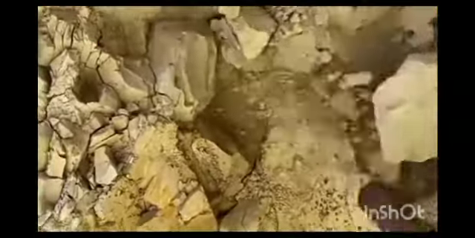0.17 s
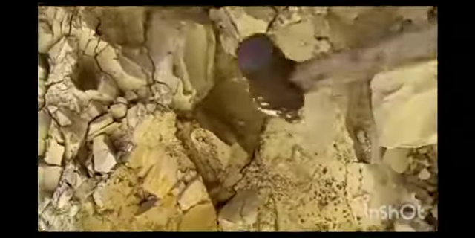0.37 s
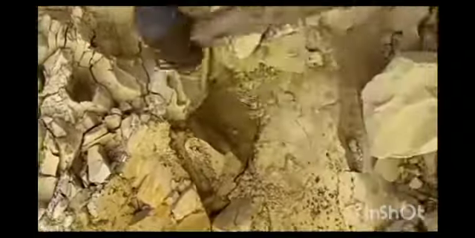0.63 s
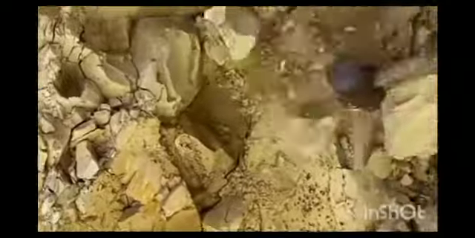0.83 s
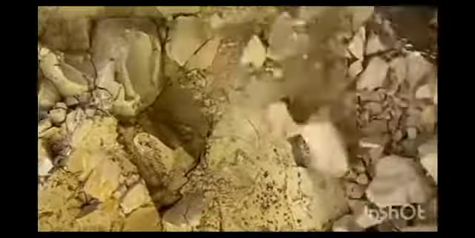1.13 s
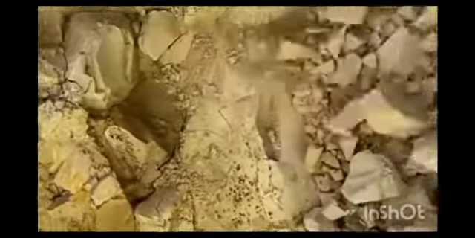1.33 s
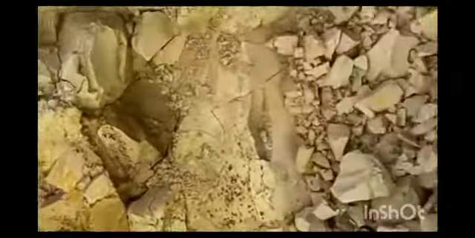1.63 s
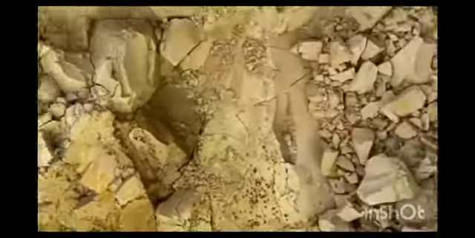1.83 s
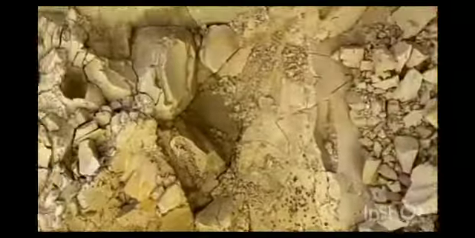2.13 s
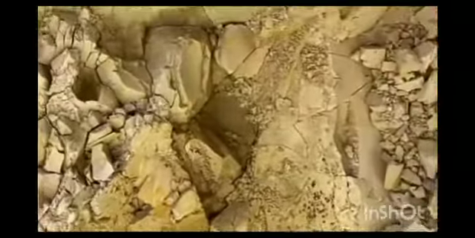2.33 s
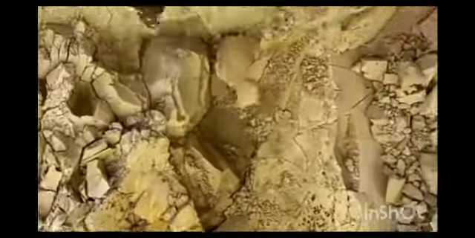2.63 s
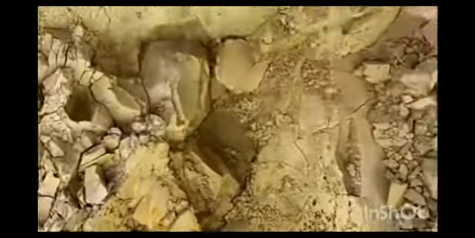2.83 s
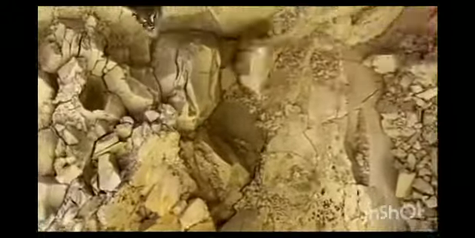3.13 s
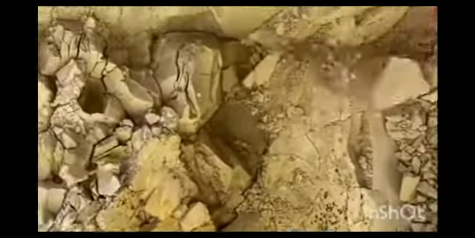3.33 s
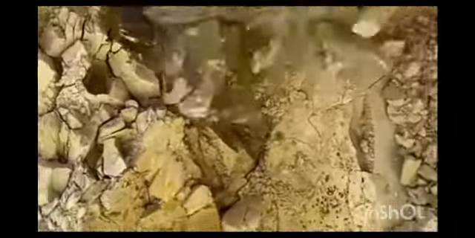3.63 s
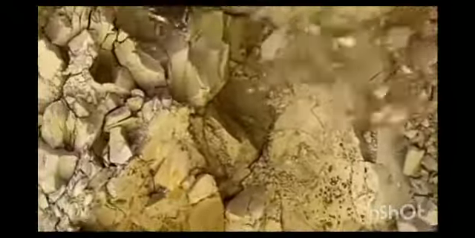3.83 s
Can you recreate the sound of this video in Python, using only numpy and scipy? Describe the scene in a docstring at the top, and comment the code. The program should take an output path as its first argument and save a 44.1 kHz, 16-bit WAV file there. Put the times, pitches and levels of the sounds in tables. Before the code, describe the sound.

Broken dry clay clicks and rattles as a hammer rakes it aside. After a short lull, two sharp blows send more crumbs tumbling, close to a small microphone over a steady low hiss.

```python
"""Hammer on dry clay.

A hammer rakes broken clay aside, then strikes it twice, close to a small microphone.
Pieces click, scrape and tumble over a steady low hiss; a thin ring near 3.7 kHz follows the blows.
The microphone passes little above 4.5 kHz and overloads on the hardest contacts."""
import sys
import numpy as np
from scipy import signal
from scipy.fft import rfft, irfft, next_fast_len
from scipy.io import wavfile
from scipy.ndimage import map_coordinates

SR = 44100
rng = np.random.default_rng(int(sys.argv[2]) if len(sys.argv) > 2 else 0)


def master(y):
    """Save y as 16-bit WAV."""
    cut = np.clip(np.atleast_2d(y).T, -1, 1)
    pcm = np.round(cut * 32767)  # scale
    wavfile.write(sys.argv[1], SR, pcm.astype(np.int16))


N = 4 * SR

# hammer and clay contacts: centre_s, level_db, length_s, pitch_hz, half_width_hz, lump_db
CONTACTS = [ (0.045, -26, 0.0037, 3420, 448, -9), (0.075, -13, 0.004, 2870, 245.6, -17.5),
            (0.081, -8, 0.0014, 2950, 200.3, -24), (0.086, -8, .0013, 3190, 215.3, -30.5),
            (.0905, -9, 0.0038, 3360, 250, -18), (0.108, -20.5, 0.007, 3140, 311, -22.5),
            (0.1127, -22, 0.0012, 2950, 246, -18), (0.1469, -6, 0.0021, 3370, 280, -27),
            (.151, -15.5, 0.005, 3220, 409, -14.5), (0.184, -28, 0.007, 3600, 282, -15.5),
            (0.286, -22, .003, 3280, 297, -15), (0.3858, -15, 0.0014, 3334, 210.4, -30),
            (0.4624, -18, .002, 3420, 291, -31), (0.4761, -7.5, 0.0028, 3318, 140.6, -36),
            (.480, -16, 0.0037, 3290, 261, -23.5), (0.561, -22.5, 0.004, 3695, 249, -29.5),
            (0.568, -16.5, 0.004, 2787, 129.4, -28), (0.61, -23.5, 0.0073, 2763, 150, -20.5),
            (0.6768, -14.5, .0018, 3400, 229, -30), (0.7225, -26, 0.0021, 3480, 301, -22.5),
            (1.0298, -18.5, 0.0046, 3640, 230, -29.5), (1.059, -16.5, 0.0046, 3475, 239, -17),
            (1.088, -28.5, 0.0036, 3544, 307.5, -12), (1.2922, -18.5, .0022, 3665, 220, -31),
            (1.315, -24.5, .006, 3676, 240, -25), (1.353, -16.5, 0.0014, 3447, 180, -35.5),
            (1.367, -18.5, .0027, 3655, 260, -26), (1.549, -18, .0023, 3570, 250, -30.5),
            (1.591, -15.5, 0.0018, 3635, 250, -22), (1.691, -17.5, 0.013, 3430, 255, -18.5),
            (1.748, -21, .003, 3440, 227.8, -17.5), (1.761, -20, .0037, 3500, 280, -21),
            (1.8057, -25, 0.0036, 3087, 446, -18), (1.848, -29, 0.0054, 3360, 392, -6),
            (2.024, -14, 0.004, 3130, 393, -22.5), (2.036, -14, 0.011, 3120, 400, -20.5),
            (2.046, -15.5, 0.0073, 3350, 351, -14.5), (2.408, -27.5, 0.0062, 2984, 277, -18),
            (2.425, -31.5, .006, 2930, 301, -21), (2.7526, -17, .0029, 3220, 364, -14.5),
            (2.757, -17.5, .0032, 3520, 395.5, -11), (2.809, -41, .0087, 3105, 366, -2),
            (2.999, -18, 0.0024, 3430, 202.2, -20.5), (3.0177, -19, 0.0015, 3290, 270, -30),
            (3.05, -22.5, .007, 3313, 377, -23), (3.068, -25, .0058, 3260, 339, -20.5),
            (3.134, -29.5, .0038, 3500, 199, -14), (3.1793, -24, 0.0038, 3340, 280, -23.5),
            (3.243, -10, 0.0014, 3300, 250, -27), (3.2585, -10.5, .0034, 2800, 325, -21.5),
            (3.2645, -1.5, .003, 3104, 400, -26.5), (3.267, -20.5, 0.0048, 2986, 490, -16),
            (3.331, -17.5, 0.0025, 3080, 330, -25.5), (3.65, -19, .0033, 3223, 210, -18),
            (3.668, -25, 0.0041, 3440, 249, -25.5), (3.706, -24.5, 0.0057, 3340, 437, -14),
            (3.714, -21.5, .003, 3066, 670, -20.5), (3.7197, -12.5, 0.0019, 3300, 319, -24),
            (3.7508, -20.5, .004, 3130, 452, -21), (3.761, -19.5, 0.0075, 3170, 380, -17),
            (3.77, -14.5, 0.0023, 2730, 280, -21), (3.773, -3, 0.0029, 2740, 279.6, -21.5),
            (3.776, -11.5, 0.0025, 1908, 120, -22.5), (3.7775, -4, .0037, 3064, 393, -28.5),
            (3.842, -19, 0.0059, 2896, 452, -21.5), (3.8708, -21, .004, 3115, 275, -22.5),
            (3.897, -31.5, 0.0049, 3090, 430, -18.5), (3.96, -27, .0033, 3620, 334.7, -15)]
# dull body of a struck lump: freq_hz, gain_db
LUMP_SPECTRUM = [(60, -36.5), (300, -22.5), (600, 5.5), (900, 3), (1350, 13.5), (1900, 12), (2600, -28.5),
                 (4300, -33.5), (5000, -3)]
# larger lumps landing: start_s, level_db, pitch_hz
KNOCKS = [(0.068, -23.5, 885), (0.094, -28, 1033), (.148, -27, 883), (.175, -28.5, 878),
          (.308, -27.5, 1082), (.479, -25, 1375), (0.564, -19, 1375), (0.586, -29.5, 1359),
          (0.605, -25, 1320), (0.674, -26, 1428), (1.056, -25.5, 1246), (1.242, -24, 1171),
          (2.814, -34, 1072), (2.999, -35.5, 831)]
# sliding rubble: time_s, level_db
SLIDE_ENVELOPE = [(0, -39), (.06, -41), (.1, -21), (.17, -35), (.24, -36), (.28, -22.5), (.315, -24),
                  (.35, -39.5), (.4, -29.5), (.45, -31), (.48, -23), (.55, -36), (.6, -36.5), (.74, -37),
                  (.8, -48), (.92, -66.5), (.955, -32.5), (.99, -49), (1.06, -40), (1.14, -31.5),
                  (1.3, -28.5), (1.37, -27), (1.42, -28), (1.47, -22.5), (1.52, -27), (1.56, -22),
                  (1.7, -24), (1.72, -27), (1.77, -23.5), (1.83, -36), (1.925, -34), (1.955, -26.5),
                  (1.975, -34), (2.0, -25.5), (2.045, -25), (2.075, -32), (2.13, -41.5), (2.35, -55),
                  (2.41, -34.5), (2.45, -48.5), (2.68, -49.5), (2.745, -31.5), (2.79, -58.5), (2.93, -55),
                  (2.95, -36.5), (3.06, -40), (3.1, -37), (3.22, -38.5), (3.26, -23), (3.3, -43),
                  (3.38, -50), (3.435, -33.5), (3.56, -36), (3.63, -33.5), (3.69, -33), (3.76, -34),
                  (3.8, -40.5), (3.91, -45.5), (3.94, -34.5), (4, -33)]
# sliding crumbs: freq_hz, gain_db
CRUMB_SPECTRUM = [(100, -58.5), (300, -54), (600, -34.5), (850, -21.5), (1200, -17), (1600, -17),
                  (2200, -18), (2700, -11.5), (3100, -3), (3750, 1), (4000, -13), (4300, -13.5),
                  (5000, -16.5)]
# narrow ringing tones after each contact: pitch_hz, level_db, t60_s
RING_TONES = [(800, -8.5, 0.094), (1310, -4, 0.058), (1620, -9.5, 0.041), (2013, -4, 0.049),
              (2510, -10.5, 0.023), (2880, -8, .06), (3400, -9.5, .08), (3663, -5, 0.11)]
# background hiss: freq_hz, gain_db
HISS_SPECTRUM = [(20, -3), (35, -1.5), (60, -6.5), (100, -6), (160, -6.5), (280, -16.5), (500, -9.5),
                 (800, -8), (1250, -3), (1500, -9.5), (1900, -13), (2250, -11.5), (2700, -3.5), (3200, -5),
                 (3650, 0.5), (4000, -20.5), (4400, -21.5), (5000, -19.5)]
# brief dip in the hiss: time_s, gain_db
HISS_ENVELOPE = [(2.765, 1), (2.785, -9), (2.93, -2.5), (3.05, -2.5), (3.3, -2)]
# microphone treble roll-off: freq_hz, gain_db
MIC_RESPONSE = [(4250, -0.5), (4480, -14.5), (4650, -33), (4850, -55), (5400, -82)]


def contacts(trim_db=1):
    """Each contact rings a strongly damped shard and knocks the lump behind it."""
    out = np.zeros(N)
    for centre_s, level_db, length_s, pitch_hz, half_width_hz, lump_db in CONTACTS:
        force = fractures(length_s)
        shard = filtered(force, lambda hz: (1 + ((hz - pitch_hz) / (3.36 * half_width_hz)) ** 2) ** -4)
        lump = shaped(force, LUMP_SPECTRUM)
        click = unit_rms(shard) + amp(lump_db) * unit_rms(lump)
        gain = amp(level_db + trim_db) * np.sqrt(length_s * SR / len(click))
        add_centred(out, gain * click, centre_s)
    return out


def fractures(length_s, crush_db=-12.5, rise_s=0.0061, fall_s=0.0084, size=3072):
    """A snap inside a crunch of tiny fractures; crumbs crush before and after it."""
    t = (np.arange(size) - size // 2) / SR
    core = np.exp(-(t / (0.86 * length_s)) ** 2)
    crush = amp(crush_db) * np.exp(-np.abs(t) / np.where(t < 0, rise_s, fall_s))
    force = rng.standard_normal(size) * (core + crush)
    force /= np.linalg.norm(force)
    force[size // 2] += 2.2 * np.exp(-length_s / 0.0017)  # short contacts snap, long ones crunch
    return force


def knocks(rise_s=0.0037, t60_s=0.05, overtone_ratio=1.6, overtone_db=-9, size=8192):
    """Larger lumps land with a short, rough, hollow note and one overtone."""
    out = np.zeros(N)
    t = (np.arange(size) - size // 2).clip(0) / SR
    envelope = (1 - np.exp(-t / rise_s)) * amp(-60 * t / t60_s)
    roughness_rad = 0.52 * wobble(350)
    for row, (start_s, level_db, pitch_hz) in enumerate(KNOCKS):
        phase = 2 * np.pi * pitch_hz * t + roughness_rad[row * size:][:size]
        note = np.sin(phase) + amp(overtone_db) * np.sin(overtone_ratio * phase)
        add_centred(out, amp(level_db) * envelope * note, start_s)
    return out


def rubble(grains_per_s=1300, spread_db=2.5, dust_db=-4.5, jerk_db=1.98):
    """Pieces slide in jerks: a dense rattle of crumbs over the rub of dust."""
    impulses = (rng.random(N) < grains_per_s / SR) * rng.choice([-1, 1], N)
    grains = impulses * amp(spread_db * np.minimum(rng.exponential(size=N), 3))
    rattle = unit_rms(grains) + amp(dust_db) * rng.standard_normal(N)
    scrape = comb_colour(shaped(rattle, CRUMB_SPECTRUM), copy_gain=0.25)
    return scrape * amp(curve(SLIDE_ENVELOPE) + jerk_db * wobble(70))


def scatter_and_ring(clay, scatter_db=-21.5, scatter_t60_s=0.036, ring_db=-18):
    """Short scatter and narrow tones after each contact, the longest a thin ring near 3.7 kHz."""
    t = np.arange(SR // 4) / SR
    scatter_ir = rng.standard_normal(len(t)) * amp(-60 * t / scatter_t60_s)
    ring_ir = sum(np.cos(2 * np.pi * hz * t) * amp(db - 60 * t / t60_s) for hz, db, t60_s in RING_TONES)
    scatter = unit_rms(signal.fftconvolve(clay, scatter_ir)[:N])
    ring = unit_rms(signal.fftconvolve(clay, ring_ir)[:N])
    return clay.std() * (amp(scatter_db) * scatter + amp(ring_db) * ring)


def background(hiss_db=-43, waver_db=1.6, hum_hz=402, hum_db=-71):
    """Slightly wavering hiss and rumble with one brief dip; a faint hum."""
    hiss = comb_colour(shaped(rng.standard_normal(N), HISS_SPECTRUM), copy_gain=0.41)
    hum = np.sqrt(2) * np.sin(2 * np.pi * hum_hz * np.arange(N) / SR + 0.5 * wobble(6))
    level_db = hiss_db + curve(HISS_ENVELOPE) + waver_db * wobble(8.3)
    return amp(level_db) * hiss + amp(hum_db) * hum


def comb_colour(x, copy_gain, min_delay_s=0.003, max_delay_s=0.022, corner_hz=710, count=7):
    """Short delayed copies give a faint hollow colour above corner_hz. Output at rms 1."""
    delays_s = rng.uniform(min_delay_s, max_delay_s, count)
    copies = sum((-1) ** k * np.pad(x, (int(s * SR), 0))[:N] for k, s in enumerate(delays_s))
    highpass = lambda hz: copy_gain * hz ** 4 / (hz ** 4 + corner_hz ** 4)
    power_trim = lambda hz: 1 / np.sqrt(1 + count * highpass(hz) ** 2)
    treble_copies = filtered(copies, lambda hz: highpass(hz) * power_trim(hz))
    return unit_rms(filtered(x, power_trim) + treble_copies)


def amp(db):
    """Decibels to gain."""
    return 10 ** (np.asarray(db) / 20)


def unit_rms(x):
    """Scale to rms 1."""
    return x / np.sqrt(np.mean(x ** 2) + 1e-20)


def curve(rows):
    """One value per sample from (time_s, value) rows."""
    return np.interp(np.arange(N) / SR, *np.transpose(rows))


def wobble(knots_per_s):
    """Smooth random curve."""
    knots = rng.standard_normal(int(N * knots_per_s / SR) + 4)
    return map_coordinates(knots, [np.arange(N) * knots_per_s / SR])


def filtered(x, response):
    """Apply response(hz) by FFT."""
    size = next_fast_len(len(x) + 4096)
    return irfft(rfft(x, size) * response(np.fft.rfftfreq(size, 1 / SR)), size)[:len(x)]


def shaped(x, spectrum):
    """Filter by (freq_hz, gain_db) rows, joined on a log axis."""
    freq_hz, gain_db = np.transpose(spectrum)
    return filtered(x, lambda hz: amp(np.interp(np.log(hz + 1), np.log(freq_hz + 1), gain_db)))


def add_centred(track, sound, centre_s):
    """Mix a sound in with its midpoint at centre_s."""
    at = round(centre_s * SR) - len(sound) // 2 + np.arange(len(sound))
    inside = (at >= 0) & (at < N)
    track[at[inside]] += sound[inside]


def scene():
    """Clay and hammer over the background, mono."""
    clay = contacts() + knocks() + rubble()
    return (clay + scatter_and_ring(clay) + background())[None]


def record(dry):
    """Narrow-band microphone; loud peaks clip and leave a slow offset."""
    clip_level, hardness, top_hz = 0.68, 16, 15900
    sag_gain, sag_delay_s, sag_rise_s, sag_fall_s = 0.34, 0.007, 0.0005, 0.019
    x = shaped(dry[0], MIC_RESPONSE)
    clipped = x / (3.5 + np.abs(x / clip_level) ** hardness) ** (1 / hardness)
    excess = np.abs(x - clipped)
    lag = lambda hz, tau_s: 1 / (1 + 2j * np.pi * hz * tau_s)
    delay = lambda hz: np.exp(-2j * np.pi * hz * sag_delay_s)
    sag = filtered(excess, lambda hz: lag(hz, sag_fall_s) * lag(hz, sag_rise_s) * delay(hz))
    return filtered(clipped - sag_gain * sag, lambda hz: 1 / (1 + (hz / top_hz) ** 120))[None]


dry = scene()
out = record(dry)
master(out)
```